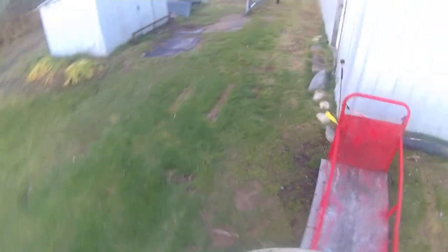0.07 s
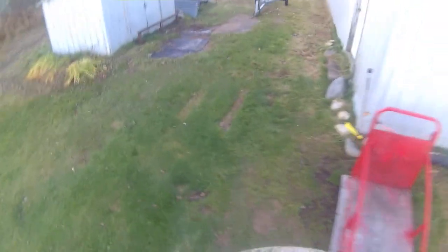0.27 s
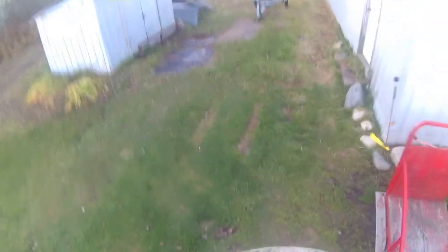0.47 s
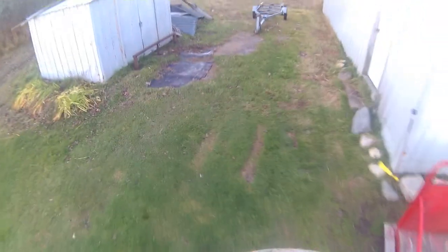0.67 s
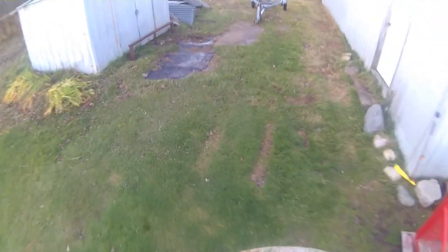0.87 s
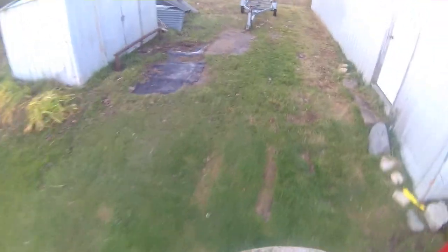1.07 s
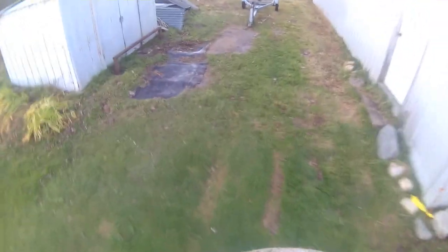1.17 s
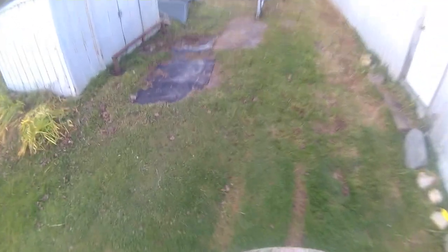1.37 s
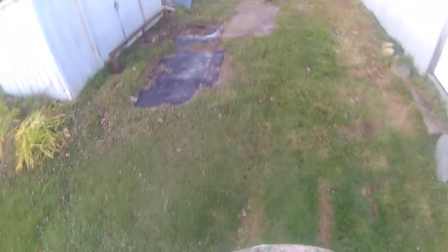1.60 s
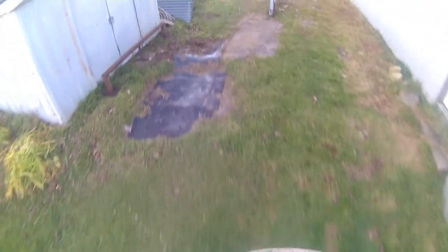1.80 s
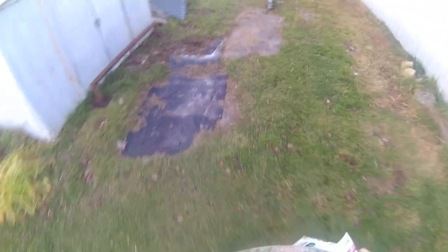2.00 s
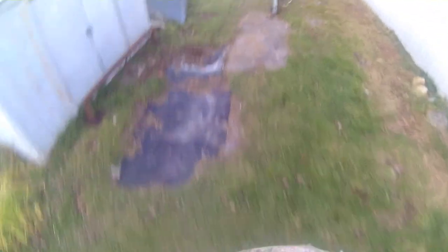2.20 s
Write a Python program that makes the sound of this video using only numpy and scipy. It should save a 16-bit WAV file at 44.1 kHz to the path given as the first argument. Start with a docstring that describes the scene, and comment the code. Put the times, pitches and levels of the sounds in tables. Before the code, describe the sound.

Someone walks across a lawn, low jolts and dry crackling rustle over faint outdoor hiss

```python
"""A lawn between sheds: someone walks across it, the microphone carried on the body.
Each step jolts it with deep thumps, made of slow swings under bell-shaped envelopes.
Grass, straps and cloth crackle and snap by ringing a small housing; brushes and ticks are shaped noise.
A bush cricket buzzes nearby with runs of ringing wing strokes.
Behind lie a far rumble and hiss of banded noise and a thin electronic whine of wavering sines."""
import sys
import numpy as np
from scipy import signal
from scipy.io import wavfile

SR = 44100
rng = np.random.default_rng(int(sys.argv[2]) if len(sys.argv) > 2 else 0)


def ratio_of_db(decibels):
    """Turn decibels (scalar or array-like) into linear amplitude factors; 0 dB maps to 1."""
    return 10 ** (np.asarray(decibels, float) / 20)


def inscribe(sig):
    """Save sig as 16-bit PCM at rate SR to the path in sys.argv[1].

    A 1-D sig is mono; a 2-D sig holds one channel per row.
    Samples are clipped to [-1, 1] before scaling.
    """
    pcm = np.round(np.clip(np.atleast_2d(sig).T, -1, 1) * 32767)
    wavfile.write(sys.argv[1], SR, pcm.astype(np.int16))


N = 99225  # samples
T_S = np.arange(N) / SR

# The ways the small housing rings when snaps and crackle set it off.
# Each row: pitch in Hz, strength in dB added to the blow, time to die by 60 dB in seconds.
HOUSING_MODES = [(1253, 7.5, 0.015), (1550, 7.5, 0.0064), (1958, 5.5, 0.013), (2920, 10, 0.0055),
                 (3350, 5.5, 0.0059), (3750, 7, 0.0066), (4260, 8.5, 0.0053), (5870, 14, 0.0049)]
RISE_T60_S = 0.003  # a snap or wing stroke swells briefly before it dies


def rms_one(x):
    """Scale to rms 1."""
    return x / np.sqrt(np.mean(x ** 2) + 1e-20)


def drift(rate_hz):
    """Slow random wandering with spread 1: noise smoothed twice, made at every 40th sample."""
    r = np.exp(-2 * np.pi * rate_hz * 40 / SR)
    noise = rng.standard_normal(N // 40 + 2002)
    slow = signal.lfilter([1], [1, -2 * r, r * r], noise)[2000:]  # skip the settling
    return np.interp(np.arange(N) / 40, np.arange(len(slow)), rms_one(slow))


def ring(clicks, hz, t60):
    """A unit click sets a sine of height about 1 ringing; it falls 60 dB in t60 seconds."""
    r = ratio_of_db(-60 / (t60 * SR))
    w = 2 * np.pi * hz / SR
    return signal.lfilter([0, np.sin(w)], [1, -2 * r * np.cos(w), r * r], clicks + 1e-18)


def band_noise(hz, width_hz):
    """Noise in a band, rms 1."""
    edges = [hz - width_hz / 2, hz + width_hz / 2]
    sos = signal.butter(2, edges, "band", fs=SR, output="sos")
    return rms_one(signal.sosfilt(sos, rng.standard_normal(N)))


def decays(s, db, t60):
    """Envelope that jumps at each time and dies away by 60 dB in t60 seconds."""
    clicks = np.zeros(N)
    np.add.at(clicks, (np.asarray(s) * SR).astype(int), ratio_of_db(db))
    return signal.lfilter([1], [1, -ratio_of_db(-60 / (t60 * SR))], clicks + 1e-18)


def bell(s, length):
    """Bell-shaped envelope; length is its width at half height in seconds."""
    return np.exp(-np.log(16) * ((T_S - s) / length) ** 2)


def air(patchy_db):
    """Far rumble and hiss: half-octave bands of noise, each wavering a little."""
    # Balance of the noise from low to high.
    # Each row: frequency in Hz, relative level in dB per Hz.
    air_balance = [(10, 0.5), (27, -4), (54, 0), (154, -7), (426, -15), (1010, -20.5), (1290, -22.5),
                   (3340, -29.5), (7440, -32), (12200, -33.5), (15600, -30.5)]
    level_db = -60.5  # rms of the whole
    table_hz, table_db = np.transpose(air_balance)
    edges = 11 * 2 ** np.arange(0, 10.6, 0.5)
    white = rng.standard_normal((2, N + SR))  # neighbouring bands take different noises
    out = 0
    for k, (low, high) in enumerate(zip(edges, edges[1:])):
        sos = signal.butter(2, [low, high], "band", fs=SR, output="sos")
        band = signal.sosfilt(sos, white[k % 2])[SR:]  # skip the settling
        band_db = np.interp(np.log(low * high) / 2, np.log(table_hz), table_db)
        out = out + band * ratio_of_db(band_db + patchy_db * drift(5.8))
    return ratio_of_db(level_db) * rms_one(out)


def whine():
    """Thin tones of the electronics: sines that waver slightly in pitch together."""
    # Each row: pitch in Hz, level in dB rms.
    tones = [(15421, -96), (15478, -89), (15536, -96)]
    waver_hz = 4
    waver_turns = np.cumsum(waver_hz * drift(5.8)) / SR
    out = np.zeros(N)
    for hz, db in tones:
        turns = hz * T_S + waver_turns + rng.random()
        out += np.sqrt(2) * ratio_of_db(db) * np.sin(2 * np.pi * turns)
    return out


def ticks():
    """Tiny bright ticks: short puffs of high noise that jump up and die away."""
    # Each row: start in seconds, rough peak level in dB.
    tick_list = [(0.2732, -58), (0.2986, -56), (0.5022, -56), (0.806, -57), (1.187, -54)]
    s, peak_db = np.transpose(tick_list)
    envelope = decays(s, peak_db - 7.5, t60=0.017)  # noise peaks stand above its rms
    return band_noise(hz=12100, width_hz=3600) * envelope


def cricket():
    """Each buzz is a run of wing strokes, strong and weak in turn, that ring the wing's modes."""
    # Each row: start in seconds, length in seconds, drive level in dB.
    buzzes = [(1.097, 0.022, -63), (1.128, 0.036, -56.5), (1.438, 0.033, -56.5), (1.806, 0.036, -57.5),
              (2.071, 0.045, -56.5)]
    # The ways the wing rings.
    # Each row: pitch in Hz, strength in dB added to the drive, time to die by 60 dB in seconds.
    wing_modes = [(11400, -5, .014), (11750, -5, .014), (12150, -6, .012), (12550, -10, .01),
                  (13000, -10, .009), (13500, -15, .008)]
    strokes_per_s, stroke_spread_db, weak_stroke_db = 281, 2.5, -3
    k = np.arange(12)  # at most 12 strokes per buzz
    out = np.zeros(N)
    for start, length, level_db in buzzes:
        s = start + (k + 0.22 * rng.random(len(k))) / strokes_per_s  # slightly uneven
        for hz, mode_db, t60 in wing_modes:
            luck_db = stroke_spread_db * rng.standard_normal(len(k))
            db = level_db + mode_db + weak_stroke_db * (k % 2) + luck_db
            sign = rng.choice([-1, 1], len(k))
            clicks = np.zeros(N)
            clicks[(s * SR).astype(int)] = ratio_of_db(db) * (s < start + length) * sign
            out += ring(clicks, hz, t60) - ring(clicks, hz, RISE_T60_S)
    return out


def brushes():
    """Grainy swells of blades sliding along shoes and cloth: noise bands with a jittery level."""
    # Each row: centre in seconds, length in seconds, middle level in dB, pitch in Hz, band width in Hz.
    brush_list = [(0.32, 0.05, -71, 1370, 446), (0.62, 0.016, -73, 3800, 452),
                  (1.034, 0.043, -70, 1260, 396), (1.061, 0.033, -74, 3670, 1500),
                  (1.362, 0.044, -68.5, 1600, 1000), (1.535, 0.05, -67, 1350, 700),
                  (1.814, 0.02, -68.5, 1080, 604)]
    out = np.zeros(N)
    for s, length, db, hz, width_hz in brush_list:
        grainy = ratio_of_db(db + 2.4 * drift(44))
        out += grainy * bell(s, length) * band_noise(hz, width_hz)
    return out


def crackle():
    """Moving grass and cloth: random tiny clicks, thicker with movement, each ring one housing mode."""
    # How much grass and cloth move; only the rise and fall about the mean counts.
    # Each row: time in seconds, level in dB.
    movement = [(0.0, -74), (0.34, -71), (0.67, -74.5), (1.27, -68.5), (1.5, -69.5), (1.62, -72.5),
                (1.92, -71), (2.07, -74.5), (2.25, -73.5)]
    # One value per housing mode: how strongly the grains ring it, in dB.
    grain_colour_db = [5, 1.5, -0.5, -2, -4, -4, -4.5, -7.5]
    grains_per_s, grain_spread_db = 1400, 2.1
    level_db, follows = -74.5, 2.1  # follows: how strongly the movement is exaggerated
    s, db = np.transpose(movement)
    move_db = follows * np.interp(T_S, s, db - db.mean())
    size_db = grain_spread_db * np.minimum(rng.exponential(1, N), 4)
    sizes = ratio_of_db(size_db) * rng.choice([-1, 1], N)
    # half of the movement goes into how many grains there are, half into their loudness
    born = rng.random(N) < grains_per_s * ratio_of_db(move_db / 2 + 4 * drift(15)) / SR
    dealt = rng.integers(0, len(HOUSING_MODES), N)  # which mode each grain rings
    out = 0
    for k, (hz, _, t60) in enumerate(HOUSING_MODES):
        clicks = sizes * born * (dealt == k) * ratio_of_db(grain_colour_db[k])
        out = out + ring(clicks, hz, t60)
    return ratio_of_db(level_db + move_db / 2) * rms_one(out)


def snaps():
    """Each snap is a burst of noise plus a blow that rings all modes of the housing."""
    # Each row: start in seconds, drive of the low, middle and bright ring in dB,
    # and where the bright ring is strongest in Hz.
    snap_list = [(0.409, -56, -65, -52.5, 4260), (0.686, -64, -78, -80, 3700),
                 (0.8325, -61, -71, -59, 3800), (0.857, -51, -59, -61, 3750), (1.023, -63, -67, -60, 3670),
                 (1.056, -67, -58.5, -67, 3000), (1.1157, -55, -63, -62.5, 3600),
                 (1.1682, -57.5, -58, -51, 3350), (1.1883, -53.5, -56.5, -58, 6000),
                 (1.2624, -71, -80, -61, 4000), (1.279, -58, -80, -70, 3500), (1.324, -66, -75, -74, 3200),
                 (1.3624, -58, -60, -64, 3700), (1.409, -67, -67, -69, 3800), (1.4137, -62, -77, -82, 3700),
                 (1.4915, -62, -75, -80, 3700), (1.5277, -66, -68, -63, 3900),
                 (1.559, -70, -64, -57.5, 4000), (1.739, -75, -69, -58, 3000),
                 (1.851, -74, -66, -56.5, 4270), (1.866, -63, -61.5, -57, 4100),
                 (1.8824, -57, -70, -64, 3300), (1.9143, -72, -72, -57.5, 3750),
                 (1.924, -65.5, -80, -72, 3000), (1.954, -80, -68, -62, 4200),
                 (1.971, -70, -59, -52.5, 3600), (1.9834, -62, -61, -57, 4000),
                 (1.993, -66, -65, -62, 4000), (2.028, -65.5, -77, -60.5, 3800),
                 (2.0566, -66, -58, -68, 3000), (2.2328, -68, -73, -58.5, 3700)]
    crack_db, crack_t60_s = -8.5, 0.028  # noise burst, against the bright drive
    focus_db_per_octave, focus_most_db = 42, 6  # bright modes away from the strongest ring weaker
    low_lag_s = 0.00078  # the three lowest modes start later
    at, low, middle, bright, focus_hz = np.transpose(snap_list)
    fall = decays(at, bright + crack_db, crack_t60_s)
    quick = decays(at, bright + crack_db, RISE_T60_S)
    out = band_noise(hz=4100, width_hz=5500) * (fall - quick)
    lows = [low, (low + middle) / 2, middle]
    for k, (hz, mode_db, t60) in enumerate(HOUSING_MODES):
        if k < len(lows):
            drive_db, start = lows[k], at + low_lag_s
        else:
            octaves_off = abs(np.log2(hz / focus_hz))
            drive_db = bright - np.minimum(focus_db_per_octave * octaves_off, focus_most_db)
            start = at
        clicks = np.zeros(N)
        clicks[(start * SR).astype(int)] = (-1) ** k * ratio_of_db(drive_db + mode_db)
        out = out + ring(clicks, hz, t60) - ring(clicks, hz, RISE_T60_S)
    return out


def thumps():
    """Each jolt is a couple of slow swings under a lopsided bell-shaped envelope."""
    # Jolts through the body.
    # Each row: centre in seconds, envelope peak in dB, pitch in Hz, length in seconds.
    jolts = [(0.064, -52.5, 30.7, 0.14), (0.102, -51, 36, 0.037), (0.165, -39, 32.4, 0.025),
             (0.198, -32, 25.5, 0.049), (0.299, -46.5, 22.8, 0.068), (0.723, -46.5, 37.8, 0.038),
             (0.767, -41, 23.7, 0.045), (0.826, -48, 26.3, 0.05), (1.138, -49.5, 32.8, 0.059),
             (1.188, -54.5, 27.5, 0.028), (1.266, -46, 27.7, 0.042), (1.316, -41.5, 28.8, 0.047),
             (1.434, -46, 24, .05), (1.814, -42.5, 33.1, 0.039), (1.875, -41, 28.7, .035),
             (1.958, -44, 23.4, 0.052)]
    rise_share = 0.73  # a jolt rises quicker than it falls
    shake = ratio_of_db(-24) * band_noise(hz=79, width_hz=60)  # a quicker shake rides on each thump
    out = np.zeros(N)
    for s, db, hz, length in jolts:
        swing = np.cos(2 * np.pi * (hz * (T_S - s) + rng.random()))
        lopsided = length * np.where(T_S < s, rise_share, 2 - rise_share)
        out += ratio_of_db(db) * bell(s, lopsided) * (swing + shake)
    return out


def scene():
    """All sources added up, one channel."""
    background = air(patchy_db=0.8) + whine()
    small_sounds = ticks() + cricket() + brushes()
    walking = crackle() + snaps() + thumps()
    return (background + small_sounds + walking)[None]


def top_cut(x):
    """Nothing passes above the cut-off."""
    return signal.sosfilt(signal.butter(12, 15710, fs=SR, output="sos"), x)


def record(dry):
    """Turn the finished mix into the sound that is heard."""
    return top_cut(dry)


dry = scene()
out = record(dry)
inscribe(out)
```